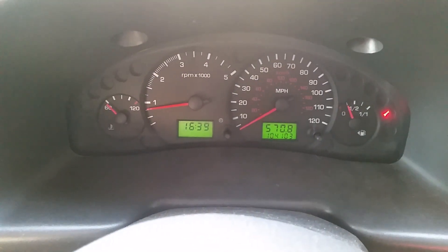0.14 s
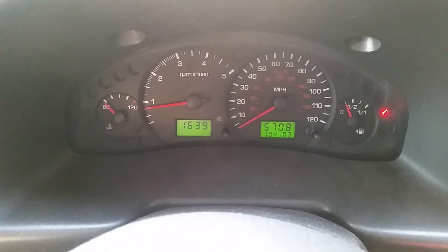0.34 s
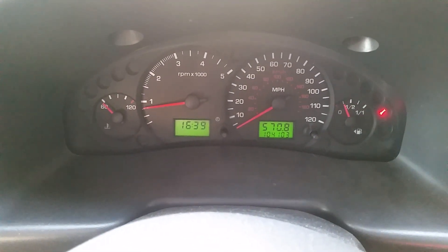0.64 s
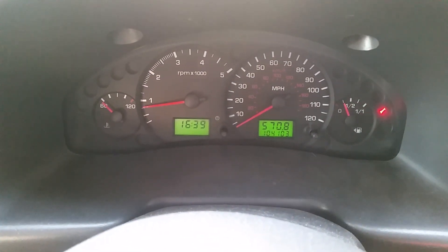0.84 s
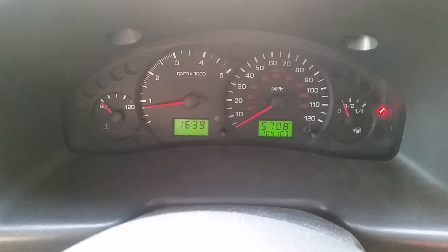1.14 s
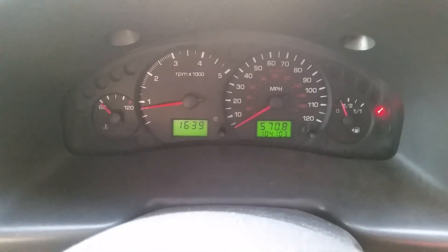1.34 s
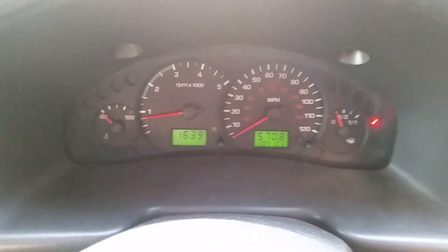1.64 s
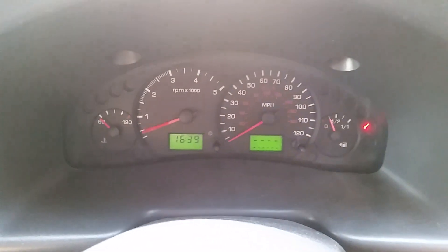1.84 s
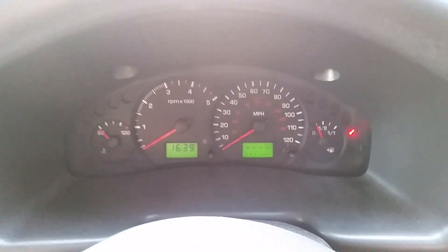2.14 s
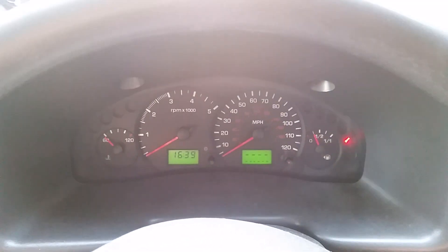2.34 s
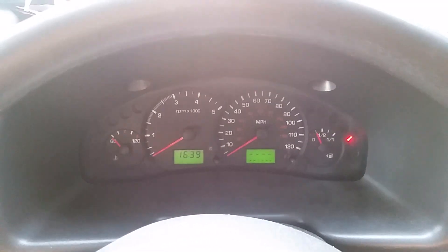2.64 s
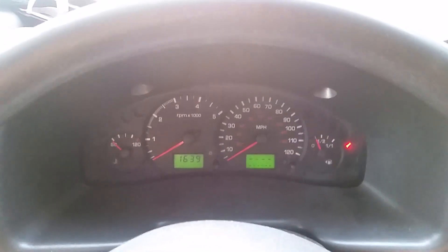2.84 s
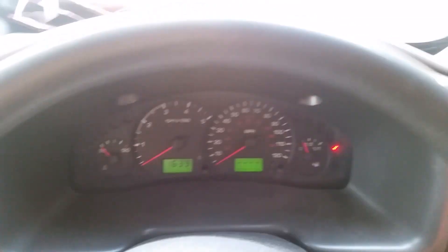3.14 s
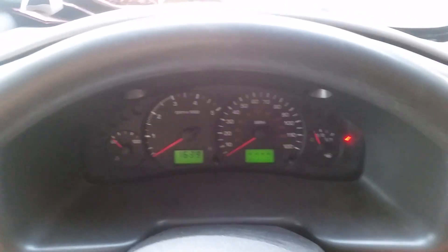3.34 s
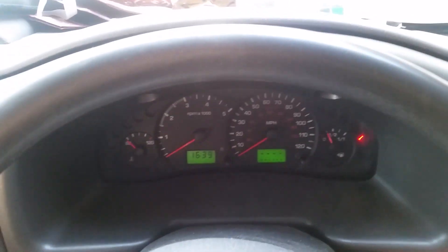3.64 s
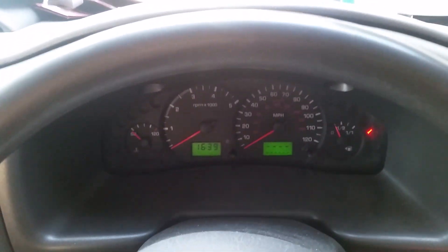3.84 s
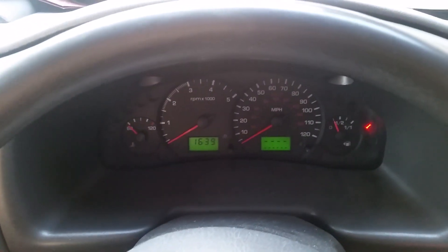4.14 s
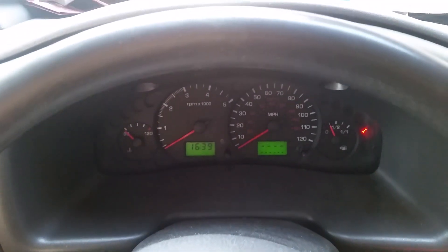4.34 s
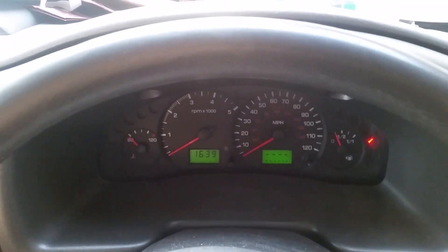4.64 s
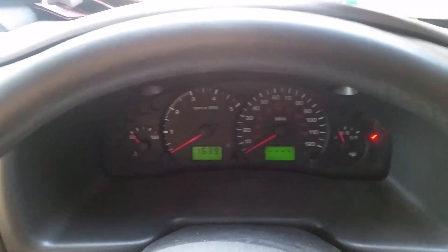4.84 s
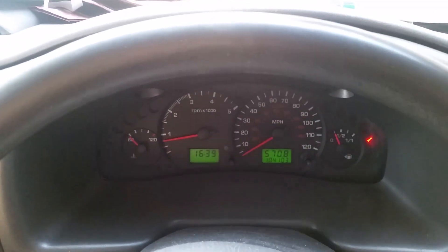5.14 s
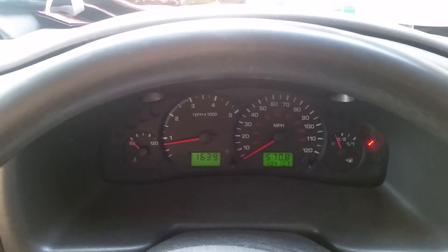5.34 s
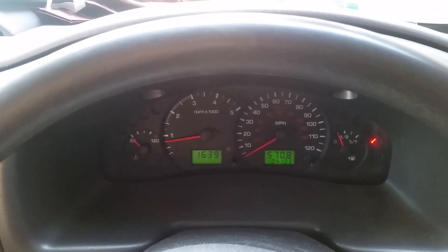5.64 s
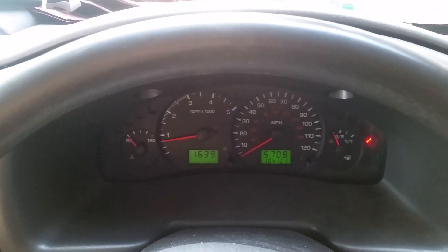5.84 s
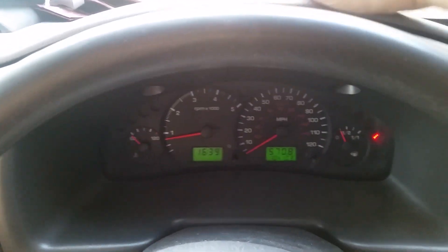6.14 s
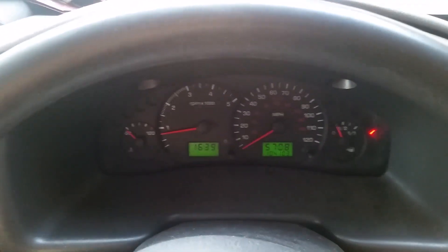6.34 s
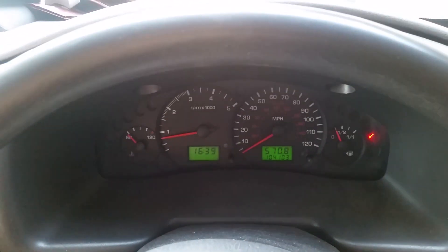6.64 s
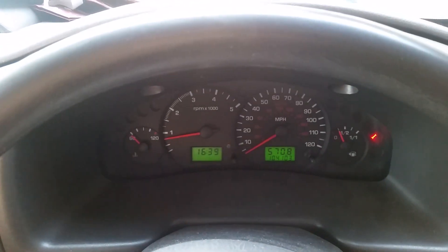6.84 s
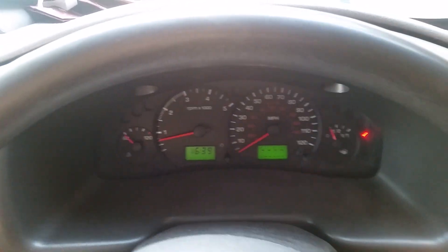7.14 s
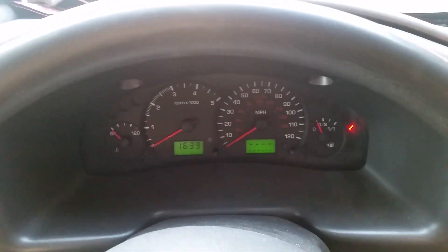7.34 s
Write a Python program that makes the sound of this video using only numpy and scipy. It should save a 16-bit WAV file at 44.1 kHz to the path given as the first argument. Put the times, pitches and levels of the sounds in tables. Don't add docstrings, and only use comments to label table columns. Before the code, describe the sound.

A four-cylinder diesel idles steadily, heard close inside a van cab on a handheld phone. It begins quiet and dull, then opens up within a second into low drumming and clatter. Cloth brushes the seat, trim ticks and squeaks faintly, fingers bump the phone. Late on, a hand slaps the plastic dash twice, and the engine drops back after each slap and slowly returns.

```python
import sys
import numpy as np
from scipy import signal
from scipy.fft import rfft, irfft, next_fast_len
from scipy.io import wavfile
from scipy.ndimage import uniform_filter1d, map_coordinates

SR = 44100
rng = np.random.default_rng(int(sys.argv[2]) if len(sys.argv) > 2 else 0)


def gain_from_db(level_db):
    decades = np.asarray(level_db, float) / 20
    return 10 ** decades


def log_audio(samples):
    frames = np.atleast_2d(samples).T
    limited = np.clip(frames, -1, 1)
    pcm = np.round(limited * 32767).astype(np.int16)
    wavfile.write(sys.argv[1], SR, pcm)


N = 330309
T = np.arange(N) / SR
FFT_SIZE = next_fast_len(N, True)
F = np.maximum(np.fft.rfftfreq(FFT_SIZE, 1 / SR), 1.)


def curve(table):
    s, *columns = np.transpose(table)
    return [np.interp(T, s, column) for column in columns]


def over_hz(table, column=1):
    rows = np.array(table)
    return np.interp(np.log(F), np.log(rows[:, 0]), rows[:, column])


def level(x, db):
    return x * gain_from_db(db) / np.sqrt(np.mean(x ** 2))


def resonance(hz, width):
    return 1j * F * width / (hz ** 2 - F ** 2 + 1j * F * width)


def walk(rate):
    hold = int(SR / rate)
    levels = np.repeat(rng.standard_normal(N // hold + 1), hold)
    return uniform_filter1d(levels, hold)[:N]


def noise(envelope):
    return rng.standard_normal((3, N)) * envelope


def burst(s, ms):
    out, at = np.zeros(N), int(np.ceil(s * SR))
    part = out[at:at + int(ms * SR / 200)]
    part += gain_from_db(-20 * np.arange(len(part)) * 1e3 / SR / ms)
    return out


def ring(modes, kick):
    age = T[:SR // 2]
    tone = sum(gain_from_db(db - 60 * age / t60) * np.sin(2 * np.pi * hz * age) for hz, db, t60 in modes)
    return signal.fftconvolve(kick, tone)[:N]


def strokes(table):
    total = 0
    for s, hold, db, swell, fade in table:
        rise = swell * np.maximum(s - T, 0)
        fall = fade * np.maximum(T - s - hold, 0)
        total = total + gain_from_db(db - rise - fall)
    return total


# frequency in Hz, left minus right in dB, left's lead in radians,
# likeness of the two sides from 0 to 1.
MIC_PAIR = [(30, 1.1, 0, .8), (200, 1.7, -.2, .7), (690, 4, 0, .7), (1150, 7, -1.2, .5), (1640, 8, -3, .45),
            (2400, 8.5, -5, .45), (4400, 4, -11, .4), (8000, 2.5, -17, .3), (16000, 1, -17, .3)]


def port_tilt():
    return gain_from_db(over_hz(MIC_PAIR) / 2) * np.exp(.5j * over_hz(MIC_PAIR, column=2))


def at_ports(sources, response):
    like = np.clip(over_hz(MIC_PAIR, column=3), 0, 1)
    tilt = port_tilt()
    common, left, right = rfft(sources, FFT_SIZE) * response
    shared = np.sqrt(like) * common
    pair = [(shared + np.sqrt(1 - like) * left) * tilt, (shared + np.sqrt(1 - like) * right) / tilt]
    return irfft(pair, FFT_SIZE)[:, :N]


def firing_boom(turns):
    return gain_from_db(-25 + .4 * walk(6)) * np.cos(2 * np.pi * turns) * gain_from_db(np.array([[.55], [-.55]]))


# frequency in Hz, width in Hz, level in dB, arrival after the firing in ms.
CAB_MODES = [(52.19, 7.87, -33.21, 24.55), (84.0, 8.4, -33.1, 7.56), (136.21, 12.05, -31.71, 5.57),
             (167.18, 16.92, -38.66, 31.09), (210.65, 20.75, -44.07, 12.95), (260.78, 37.28, -46.7, 15.84),
             (329.62, 15.6, -41.87, 9.46), (462.58, 31.03, -46.28, 15.62), (528.62, 27, -42.6, 12.51),
             (620.18, 32.97, -51, 10.45), (768.68, 28.5, -54.62, 10.12), (897.75, 62.6, -64.49, 16.47),
             (1005.5, 35.1, -58.14, 1.33)]
CYLINDERS_DB = [-1.7, .9, -.9, 1.7]
# time in seconds, level of the dash knock in dB.
NEAR_DASH = [(0, 8), (1.7, 4), (2.6, 3.5), (4.8, 3), (7.49, 2)]


def firing_knock(turns):
    jitter_ms, scatter_db, lumpy_db, bright_db = .05, .9, 3.5, 1.5
    count = np.arange(1, int(turns[-1]) + 1)
    fired = np.interp(count, turns, T)
    late = jitter_ms * rng.standard_normal(len(count))
    body = 0
    for hz, width, db, ms in CAB_MODES:
        share = min(hz / 450, 1)
        uneven_db = scatter_db * rng.standard_normal(len(count)) + np.take(CYLINDERS_DB, count % 4)
        size_db = share * uneven_db + bright_db * (hz > 700)
        size_db = size_db + (hz > 400) * np.interp(fired, *np.transpose(NEAR_DASH))
        if 200 < hz < 350:
            size_db = size_db + lumpy_db * np.cos(np.pi / 2 * count + hz)
        at = np.round((fired + (ms + late) / 1e3) * SR).astype(int) % N
        kicks = np.bincount(at, gain_from_db(size_db), N)
        body = body + rfft(kicks, FFT_SIZE) * gain_from_db(db) * resonance(hz, width)
    push = SR / (2 * 26.67) * np.exp(-(F / 1500) ** 2) / (1 + (40 / F) ** 8)
    tilt = port_tilt()
    return irfft(body * push * [tilt, 1 / tilt], FFT_SIZE)[:, :N]


def cycling(turns, count):
    size, keep = SR * 3 * count // 80, 0.888
    fresh = rng.standard_normal((3, 20 + 210 // count, size))
    rounds = signal.lfilter([np.sqrt(1 - keep ** 2)], [1, -keep], fresh, axis=1)[:, 20:]
    return rounds.reshape(3, -1)[:, (turns / count * size).astype(int)]


# frequency in Hz, density in dB per Hz.
CLATTER_COLOUR = [(40, -26), (100, -8), (280, -9.5), (400, -18.5), (600, -10), (800, -22), (1180, -29.5),
                  (1490, -24.5), (1680, -28), (2040, -32), (2500, -36.5), (3000, -28.5), (3500, -32),
                  (4200, -40.5), (5500, -67.5)]
# frequency in Hz, width in Hz, level in dB.
TRIM_MODES = [(320, 20, 6), (525, 40, 1.5), (745, 25, 6), (852, 30, 8), (970, 30, 6), (1340, 40, 4),
              (2070, 50, 4)]


def injector_clatter(turns):
    trim = 1 + sum((gain_from_db(db) - 1) * resonance(hz, width) for hz, width, db in TRIM_MODES)
    colour = gain_from_db(over_hz(CLATTER_COLOUR)) * trim
    low = 1 / (1 + (F / 1320) ** 4)
    deep = 1 / (1 + (F / 400) ** 8)
    gate_db = 0.9 * np.cos(2 * np.pi * (turns - .5)) + 0.27 * np.cos(4 * np.pi * (turns - .3))
    gate = gain_from_db(gate_db + walk(30))
    swell = gain_from_db(3.5 * np.cos(2 * np.pi * (turns - 0.45)))
    every_cycle = at_ports(cycling(turns, count=4), colour * np.sqrt(deep))
    every_firing = at_ports(cycling(turns, count=1) * swell, colour * np.sqrt(low * (1 - deep)))
    irregular = at_ports(noise(gate), colour * np.sqrt(1 - np.minimum(0.81 * low, 1)))
    return level(0.85 * every_cycle + 0.5 * every_firing + irregular, -35)


# time in seconds, firing rate in Hz.
IDLE = [(0.0, 26.813), (1.5, 26.67), (3.0, 26.629), (4.5, 26.656), (6.0, 26.665), (7.5, 26.653)]


def engine():
    turns = .345 + np.cumsum(curve(IDLE)[0]) / SR
    return firing_boom(turns) + firing_knock(turns) + injector_clatter(turns)


# frequency in Hz, density in dB per Hz.
HISS_COLOUR = [(4000, -6), (6500, -7.5), (9000, -0.5), (13000, 4), (15100, 13.5), (16000, -19.5)]


def hiss():
    colour = gain_from_db(over_hz([(2000, -44.5)] + HISS_COLOUR))
    return level(at_ports(noise(1), colour), -60)


# frequency in Hz, width in Hz, level in dB.
RUB_BANDS = [(5370, 200, -13), (6630, 220, -4), (7840, 200, -4), (8500, 490, 0), (9800, 200, 3.5),
             (10550, 200, 4.5), (11370, 180, 0)]
# start in seconds, hold in seconds, level in dB, swell in dB per s, fade in dB per s.
RUBS = [
    (1.55, 0.18, -53.5, 35, 70),
    (2.4, 0.092, -75, 50, 54.6),
    (4.0, .56, -60, 300, 114),
    (7.3, .2, -43.5, 111, 50),
]


def cloth_rub():
    bands = sum(gain_from_db(db) * resonance(hz, width) for hz, width, db in RUB_BANDS)
    rub = level(at_ports(noise(gain_from_db(2.5 * walk(30))), bands), 0)
    warped = np.cumsum(1 + 0.013 * uniform_filter1d(walk(2.5), size=9000))
    rub = np.array([map_coordinates(side, [warped], mode="mirror") for side in rub])
    return strokes(RUBS) * rub


# frequency in Hz, density in dB per Hz.
CLOTH_COLOUR = [(2350, -11.5), (4000, -12), (6180, -14.5), (7230, -14), (8360, -7.5), (9830, -12),
                (11100, -7.5), (13100, -11.5), (15000, -7), (16000, -18)]
# start in seconds, hold in seconds, level in dB, swell in dB per s, fade in dB per s.
BRUSHES = [
    (2.03, 0.15, -40.5, 69, 86),
    (2.6, 0.46, -60, 32, 6.5),
    (4.0, 0.89, -63.5, 13, 19.5),
    (7.4, .1, -48, 94.5, 50),
]


def cloth_brush():
    colour = gain_from_db(over_hz([(1200, -30)] + CLOTH_COLOUR))
    return strokes(BRUSHES) * level(at_ports(noise(gain_from_db(1.5 * walk(40))), colour), 0)


# time in seconds, level in dB,
# frequency in Hz, width in Hz, length in ms.
TICKS = [(2.678, -49, 12100, 5000, 30), (2.806, -55, 8600, 900, 30), (2.814, -35.5, 3580, 650, 17),
         (2.813, -50, 6000, 3900, 6), (2.83, -51.5, 3880, 900, 980), (2.9508, -48, 4200, 1500, 3),
         (3.7994, -42.5, 10000, 8000, 8.9), (3.8887, -40, 11900, 9000, 9), (4.779, -43, 9150, 9300, 12),
         (4.9, -52, 4730, 300, 330), (4.901, -46, 10520, 300, 260), (6.0686, -40, 4470, 700, 8.7),
         (6.1011, -42, 10000, 6040, 6), (6.188, -27, 15100, 1510, 44), (4.8338, -26, 15250, 1500, 39),
         (6.4374, -34, 10000, 8900, 7.4), (7.4613, -33, 11000, 8000, 6)]


def ticks():
    out = np.zeros((3, N))
    for s, db, hz, width, ms in TICKS:
        at = int(s * SR)
        band = signal.iirpeak(hz, hz / width, SR)
        shape = gain_from_db(db) * burst(0, ms)[:min(SR, N - at)] * np.sqrt(SR / width / 2.0)
        tick = rng.standard_normal((3, len(shape))) * shape
        out[:, at:at + len(shape)] += signal.lfilter(*band, signal.lfilter(*band, tick))
    return at_ports(out, 1)


# time in seconds, level in dB, frequency in Hz.
BUMPS = [
    (2.682, -30, 70),
    (3.198, -28, 71),
    (3.441, -23, 93),
    (3.632, -33, 110),
    (3.711, -21.5, 103),
    (3.827, -29, 112),
    (4.03, -24, 95),
    (6.398, -33, 80),
]


def bumps():
    total = 0
    for s, db, hz in BUMPS:
        total = total + gain_from_db(db) * np.exp(-((T - s) / 0.011) ** 2) * np.sin(2 * np.pi * hz * (T - s))
    return total * gain_from_db(np.array([[3.5], [-3.5]]))


# time in seconds, frequency in Hz, level in dB.
SQUEAK = [
    (2.72, 4750, -83),
    (2.735, 4830, -63),
    (2.76, 5150, -64),
    (2.785, 5170, -64),
    (2.81, 4930, -60),
    (2.82, 4800, -73),
]


def squeak():
    hz, db = curve(SQUEAK)
    sounding = (T > SQUEAK[0][0]) * (T < SQUEAK[-1][0])
    return sounding * gain_from_db(db - 2.5 + 5.0 * walk(150)) * np.sin(2 * np.pi * np.cumsum(hz) / SR)


# time in seconds, crack level in dB.
TOUCHES = [
    (4.8357, -6.5),
    (6.1869, -9.5),
]
# time in seconds, thump level in dB, thump frequency in Hz,
# panel level in dB, crack level in dB.
SLAPS = [(4.8391, 0.5, 198, -20.5, -13), (4.8504, -3.5, 278.5, -24, -18), (4.8719, -8.5, 174, -32, -16.5),
         (4.89, -26, 159, -13, -21.5), (4.91, -10.5, 156, -26, -22), (4.942, -20, 126, -23, -27.5),
         (4.999, -27, 94, -26.5, -40.5), (5.061, -17, 86, -34, -45.5), (6.1911, -1, 241.7, -7.5, -20),
         (6.198, -12.5, 293, -23.5, -32), (6.2199, -11, 184, -17.5, -18), (6.241, -29, 147, -19.5, -30),
         (6.276, -19.5, 125, -30, -55), (6.352, -26, 96.9, -40, -59)]
# frequency in Hz, level in dB.
CRACK_COLOUR = [(300, 14.5), (1000, 10.5), (2700, 1.5), (4000, -8), (5800, -18.5), (8500, -7),
                (11000, -9.5), (15000, -13), (16500, -32.5)]


def slap_crack():
    crack = 0
    for s, db in TOUCHES:
        crack = crack + gain_from_db(db) * (burst(s, 9.7) + gain_from_db(-23) * burst(s, 120))
    for s, _, _, _, crack_db in SLAPS:
        crack = crack + gain_from_db(crack_db) * burst(s, 29.2)
    colour = gain_from_db(over_hz(CRACK_COLOUR))
    return at_ports(noise(crack), colour / np.sqrt(np.mean(colour ** 2)))


# frequency in Hz, level in dB, 60 dB decay in seconds.
SHELL_MODES = [(62, -32.5, .2), (96, -15.5, 0.16), (124, -17, 0.052), (314, -12, 0.098)]


def slap_thump():
    t60_s, sag, sag_s = 0.092, 0.47, 0.0053
    thump, kicks = np.zeros(N), np.zeros(N)
    age = T[:SR // 4]
    for s, thump_db, hz, _, _ in SLAPS:
        at = int(s * SR)
        turns = np.cumsum(hz * (1 - sag * np.exp(-age / sag_s))) / SR
        thump[at:at + len(age)] += gain_from_db(thump_db - 60 * age / t60_s) * np.sin(2 * np.pi * turns)
        kicks[at] = gain_from_db(thump_db)
    return (thump + ring(SHELL_MODES, kicks)) * gain_from_db(np.array([[1.6], [-1.6]]))


# frequency in Hz, level in dB, 60 dB decay in seconds.
PANEL_MODES = [(450, -15, 0.037), (571, -13, 0.032), (627, 4, 0.037), (837, 9.5, 0.033), (994, 6.5, 0.06),
               (1300, -9, .04), (1480, -6, 0.033), (1670, 4.5, 0.043), (1950, -6, 0.044),
               (2350, -17.5, 0.04), (3430, -17.5, .03)]


def slap_panel():
    push = sum(gain_from_db(panel_db - 33.5) * burst(s, 16) for s, _, _, panel_db, _ in SLAPS)
    return at_ports([ring(PANEL_MODES, kick) for kick in noise(push)], 1)


def scene():
    cloth_and_trim = cloth_rub() + cloth_brush() + ticks() + squeak()
    slaps = slap_crack() + slap_thump() + slap_panel()
    return engine() + hiss() + cloth_and_trim + bumps() + slaps


def duck(s, back_s, fall_s, recover_s, bend):
    sink = 1 - np.exp(-(np.maximum(T - s, 0) / fall_s) ** bend)
    return sink / (1 + np.exp((T - back_s) / recover_s))


def band_limit(x):
    return signal.sosfilt(signal.butter(12, 16670, fs=SR, output="sos"), x)


# start in seconds, depth in dB, middle of the recovery in
# seconds, depth of the top in dB.
DUCKS = [
    (-0.6, -18.5, 0.61, -47),
    (4.837, -15, 5.902, -26.5),
    (6.189, -12, 7.19, -42),
]


def record(dry):
    db, top_db = 0.23, -5.5
    for s, depth, back, top_depth in DUCKS:
        db = db + depth * duck(s, back, 0.21, 0.1, 1.21)
        top_db = top_db + top_depth * duck(s, back + 0.08, .33, 0.12, 3)
    ahead_db = sum(-8.5 * np.clip(2 + 2 * (T - s) / 0.0099, 0, 1) * (T < s) for s, _ in TOUCHES)
    dry = dry * gain_from_db(ahead_db)
    dry = signal.sosfilt(signal.ellip(10, .3, 45, 15900, fs=SR, output="sos"), dry)
    upper = signal.sosfiltfilt(signal.butter(1, 900, "high", fs=SR, output="sos"), dry)
    top = signal.sosfiltfilt(signal.butter(4, 4200, "high", fs=SR, output="sos"), dry)
    middle = gain_from_db(0.54 * db) * (upper - top)
    wet = gain_from_db(db) * (dry - upper + middle) + gain_from_db(top_db) * top
    wet = wet + gain_from_db(-93) * rng.standard_normal(wet.shape)
    knee = 5
    return band_limit(wet / (1 + np.abs(wet) ** knee) ** (1 / knee))


dry = scene()
out = record(dry)
log_audio(out)
```